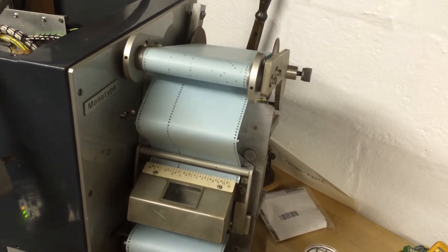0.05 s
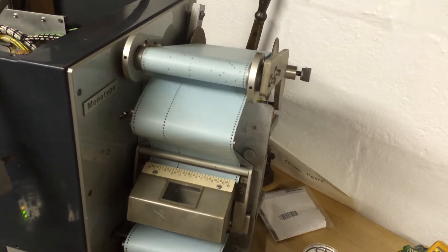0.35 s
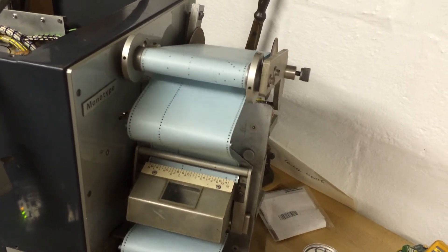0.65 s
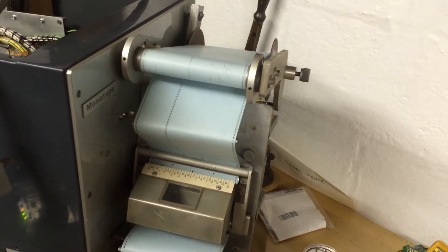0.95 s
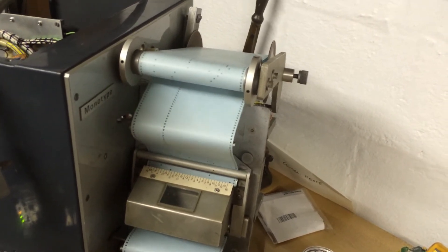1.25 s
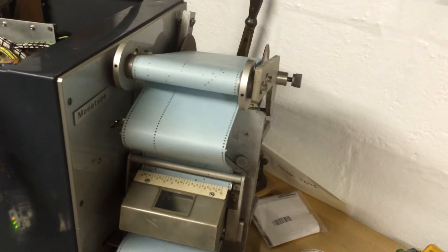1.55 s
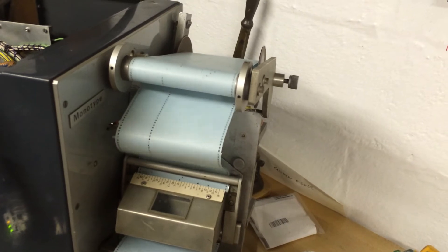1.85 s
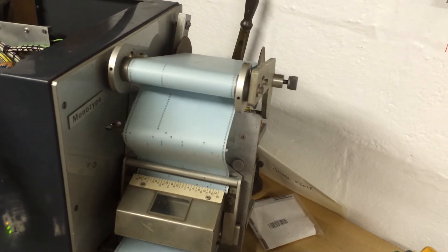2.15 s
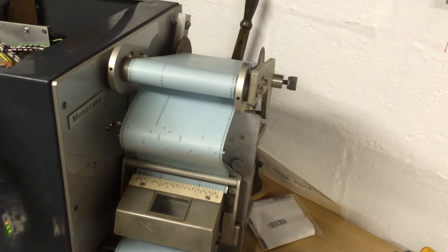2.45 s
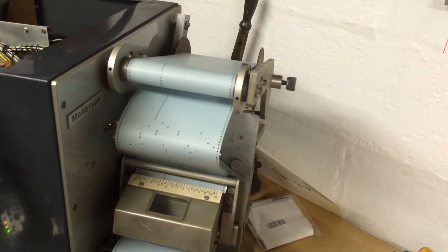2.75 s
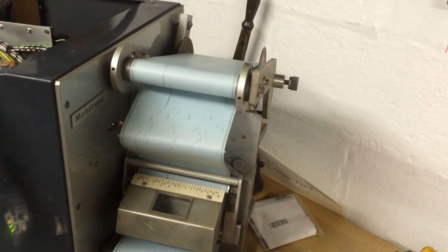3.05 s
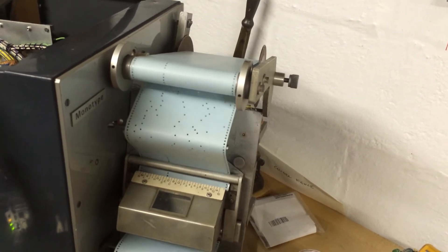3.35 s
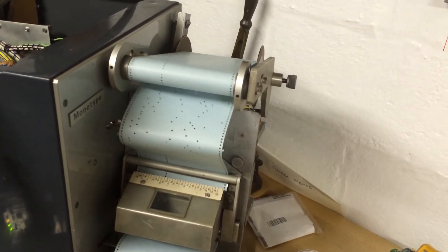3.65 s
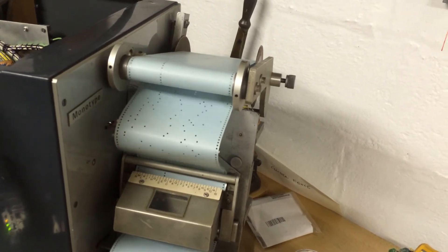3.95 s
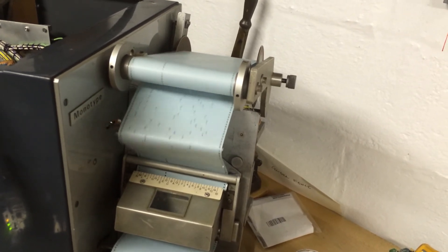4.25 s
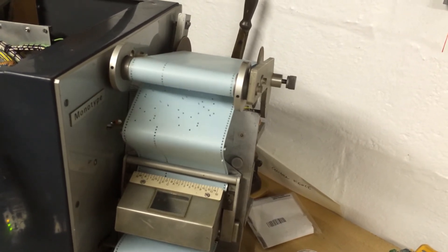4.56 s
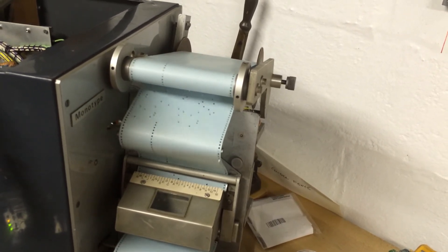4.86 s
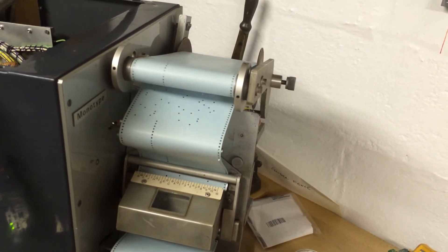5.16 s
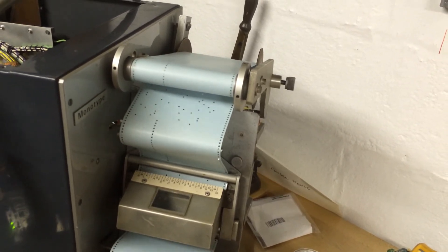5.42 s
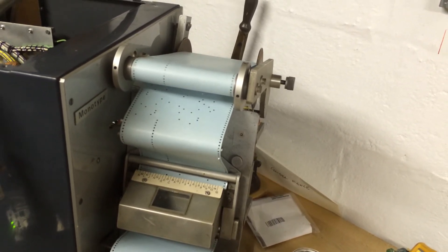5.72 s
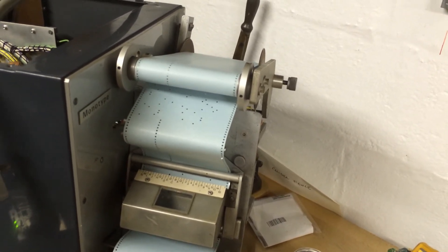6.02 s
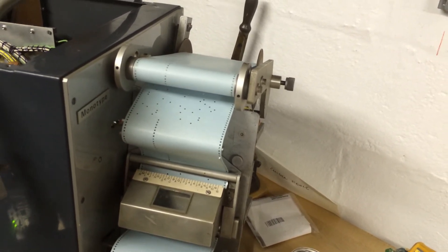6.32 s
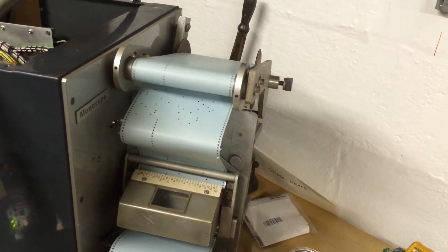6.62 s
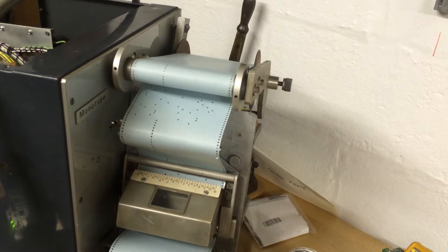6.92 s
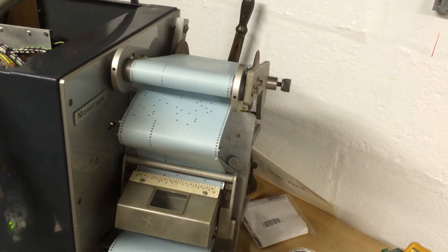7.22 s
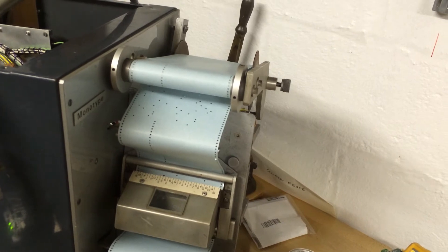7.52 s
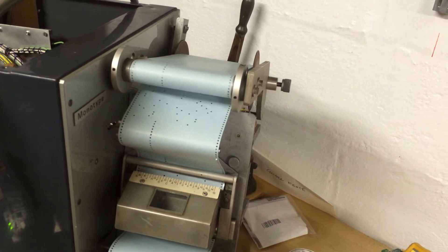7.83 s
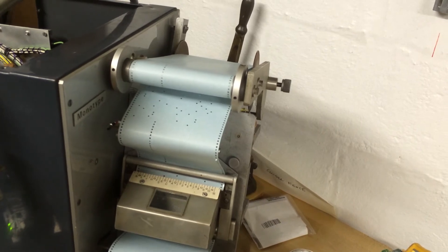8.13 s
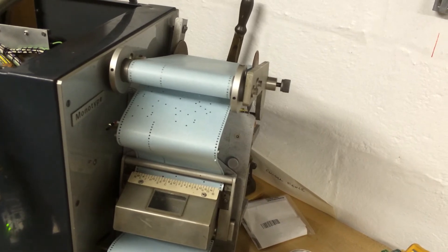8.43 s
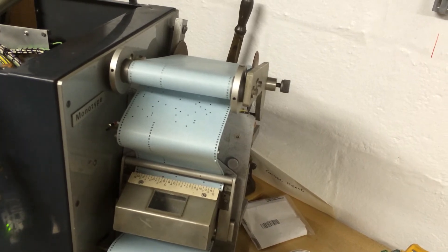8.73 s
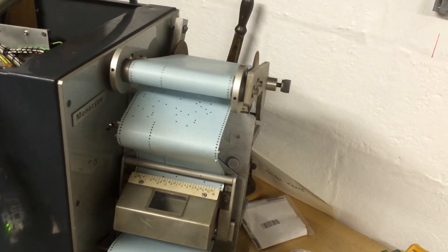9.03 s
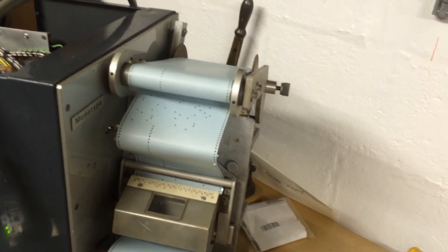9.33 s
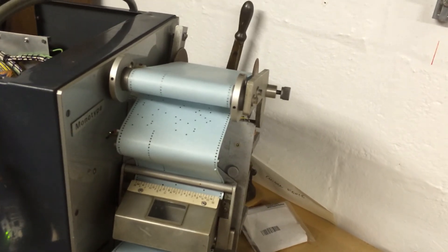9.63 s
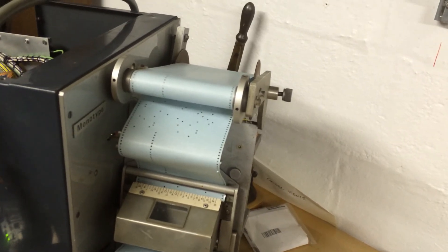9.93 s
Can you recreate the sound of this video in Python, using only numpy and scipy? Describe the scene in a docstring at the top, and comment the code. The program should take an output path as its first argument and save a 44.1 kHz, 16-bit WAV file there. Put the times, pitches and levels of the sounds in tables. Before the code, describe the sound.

A mechanical punch hammers rapidly with ringing steel and air puffs, then stops dead, leaving a fan hum and a small click.

```python
"""On a bench in a small, hard room, an air-driven ribbon punch hammers about 16 times a second.
It punches changing codes, then mostly one code over and over, and stops dead after five seconds.
At each stroke steel parts clash and ring, loose parts rattle, and used air puffs out.
The bare walls echo. A fan hums throughout, and a few small clicks follow the hammering."""
import sys
import numpy as np
from scipy import signal
from scipy.fft import rfft, irfft, next_fast_len
from scipy.io import wavfile

SR = 44100
rng = np.random.default_rng(int(sys.argv[2]) if len(sys.argv) > 2 else 0)


def wav_record(signal):
    """Record a signal, one row per channel, as 16-bit PCM in the file named by sys.argv[1]."""
    frames = np.transpose(np.atleast_2d(signal))
    bounded = np.clip(frames, -1, 1)
    # unit amplitude maps onto the largest positive 16-bit level
    quanta = np.round(bounded * 32767).astype(np.int16)
    wavfile.write(sys.argv[1], SR, quanta)


N = 440118

# the fan's rushing air: pitch_hz, level_db
FAN_RUSH = [(20, -32.5), (40, -16.5), (53, 1), (105, -4.5), (210, 0), (310, -5), (420, -1), (540, -13.5),
            (1150, -10.5), (2200, -15), (2750, -25), (4300, -24), (8000, -36.5), (15000, -43)]
# where the fan's housing rings: pitch_hz, width_hz, level_db
FAN_HOUSING = [(380.6, 32, -68), (784, 25, -65.5), (1000, 110, -56), (1133, 260, -56.5), (1658, 130, -64)]
# motor and blade tones: pitch_hz, level_db
FAN_HUM = [(120, -69), (598, -73), (1012, -62), (1681, -78), (4207, -85)]
# the fan is fainter under the hammering and dips as it ends: time_s, level_db
FAN_LOUDNESS = [(0, -2), (5.05, -3), (5.22, -7), (5.36, 0), (9.98, -1)]
# how long the echo takes to fade by 60 dB: pitch_hz, fade_s
ECHO_FADE = [(150, 0.4), (550, 1.2), (1500, 0.8), (4000, 0.62), (8000, 0.5), (15000, 0.5)]
# the echo's tone: pitch_hz, level_db
ECHO_COLOUR = [(60, -14.5), (300, -13), (550, -4), (800, -9), (1100, -12.5), (1450, -5.5), (1950, -9),
               (3200, -10), (8000, -15), (15000, -18)]
# clicks of the idle machine: start_s, level_db, fade_s, tilt_db_per_octave
IDLE_CLICKS = [(5.277, -69.5, 0.085, -14), (5.297, -66, 0.055, -14), (5.41, -62.5, 0.036, 1),
               (5.457, -68, 0.044, 1), (5.694, -38.5, 0.037, 3), (9.449, -70, 0.089, -2),
               (9.4614, -63, .009, -1), (9.474, -72, .01, -1)]
# the clicks' tone: pitch_hz, level_db
TICK_COLOUR = [(300, -17), (1200, -8), (2000, 5), (2900, -4), (3700, 4.5), (5000, -5.5), (7400, -12),
               (8500, -0.5), (10500, -13), (11800, -1), (13400, -12), (14400, -8)]
# strokes that let out a lot of air: time_s, level_db, times_usual_length
BIG_PUFFS = [(.407, -41.5, 1.06), (.591, -46, 1), (.774, -31, 1.34), (.835, -42.5, 0.97),
             (1.08, -43.5, 0.83), (1.202, -35, 1.8), (1.324, -42.5, 0.58), (1.508, -36.5, 1.2),
             (1.569, -40.5, 1), (1.631, -40.5, 1.2), (1.692, -39.5, 0.9), (2.365, -42, 0.61),
             (3.16, -45, .6), (4.444, -47, .8), (4.995, -38.5, 1.9)]
# the jolted bench's notes: pitch_hz, level_db, fade_s
BENCH_NOTES = [(210, -4, 0.019), (334.5, -2, 0.02), (428.4, 2, .04), (513, -6, 0.02)]
# the rattle's tone: pitch_hz, level_db
LOOSE_COLOUR = [(200, -24.5), (700, -0.5), (1500, 4.5), (2700, 0), (4000, 1), (8000, 0.5), (15000, -10.5)]
# notes of the linkage that punches the repeated code: pitch_hz, level_db, fade_s
LINKAGE_NOTES = [(599.3, -18.5, 0.093), (718, -16, 0.089), (941, -6, 0.054), (1111, 1.5, 0.05),
                 (1494, -2.5, 0.046), (1581, 1.5, 0.047), (1819.7, 1, 0.068), (2313, -16.5, 0.14),
                 (3600, -18, 0.0468), (4104, -5.5, 0.035), (4450, -11, 0.037), (6350, -0.5, 0.031),
                 (7630, -3, 0.033), (8250, -1.5, 0.03), (10400, -4.5, 0.037), (14600, 1.5, .025)]
# the steelwork under that linkage: pitch_hz, level_db
LINKAGE_COLOUR = [(30, -36.5), (130, -18), (300, -17.5), (440, -11), (600, -1.5), (800, -4.5), (1050, 7.5),
                  (1900, 4.5), (2800, -6), (4000, 3.5), (5800, -2), (8400, 5), (10000, -1), (12200, -0.5),
                  (14800, 1.5)]
# notes of the punch bars: pitch_hz, level_db, fade_s
BAR_NOTES = [(585.5, -15.5, 0.0886), (721.4, -17, 0.11), (915, 0.5, 0.072), (1086, -13.5, .07),
             (1295, 3.5, 0.064), (1530, -6, 0.094), (1632, -4, .07), (1817, -3.5, 0.1), (2076, 1, 0.042),
             (3386, 2.5, 0.043), (4470, -4.5, 0.044), (6570, -9.5, .04)]
# the steelwork under the bars: pitch_hz, level_db
BAR_COLOUR = [(30, -31.5), (130, -18), (300, -13), (520, 2.5), (790, -1.5), (1000, 9.5), (1700, 8.5),
              (2700, -1), (3500, 2.5), (5200, 2), (8000, 2.5), (11500, 1.5), (14800, 1.5)]
# when the code keeps changing (otherwise one code repeats): start_s, end_s
CHANGING_CODES = [(.255, 2.515), (4.66, 4.78), (4.965, 5.025)]

# pairs are (repeated code, changing code); a changing code drives more punches, so it hits harder
BAR_SHARE = (.05, .89)  # the punch bars' part in the blow, 0-1
CLASH_DB, BODY_DB = (-18.5, -17.5), (-25.5, -24.5)  # above and below SPLIT_HZ
PUFF_DB, RATTLE_DB = (-64.5, -56.5), (-48.5, -42)
FIRST_STROKE_S, STROKE_PERIOD_S, STROKE_COUNT = .04, .061172, 82
SPLIT_HZ, BLOW_S = 2600, .026
FADE_DB_PER_S = .28  # the body of the blows weakens as the microphone draws back
AGE = np.arange(4096) / SR  # seconds since one short sound began
LEAD = 8192  # spare samples before time zero


def undb(db):
    """Turn decibels into a multiplier."""
    return 10 ** (np.asarray(db) / 20)


def unit(x):
    """Scale a sound to an average power of 1."""
    return x / np.sqrt(np.mean(x ** 2))


def blow_level(x, db):
    """Scale each row so its energy, spread over the length of a blow, has the given level."""
    power = np.sum(x ** 2, -1, keepdims=True) / (BLOW_S * SR)
    return x * undb(db)[..., None] / np.sqrt(power + 1e-18)


def along(points, hz):
    """Read between the rows of a (pitch_hz, value) table, with octaves evenly spaced."""
    pitches, values = np.transpose(points)
    return np.interp(np.log(hz + 1), np.log(pitches), values)


def colour(x, points, size=4096):
    """Shape a sound's tone with a (pitch_hz, level_db) table."""
    hz = np.arange(size // 2 + 1) * SR / size
    cepstrum = irfft(np.log(undb(along(points, hz))))
    cepstrum[1:size // 2] *= 2  # folded so the filter rings only after a sound, never before
    cepstrum[size // 2 + 1:] = 0
    response = irfft(np.exp(rfft(cepstrum)))
    length = next_fast_len(x.shape[-1] + size)
    return irfft(rfft(x, length) * rfft(response, length), length)[..., :x.shape[-1]]


def band(x, hz, kind, order):
    """Keep the lows, the highs or a band between."""
    return signal.sosfilt(signal.butter(order, hz, kind, fs=SR, output="sos"), x)


def fade(age, fade_s):
    """Start at age 0, then die away by 60 dB every fade_s."""
    return (age >= 0) * np.exp(-np.log(1000) * np.maximum(age, 0) / fade_s)


def place(times, sounds):
    """Lay one sound at each time, on a track that starts a little before time zero."""
    out = np.zeros(LEAD + N + sounds.shape[1])
    for time_s, sound in zip(times, sounds):
        start = int(np.clip(LEAD + time_s * SR, 0, LEAD + N))
        out[start:start + len(sound)] += sound
    return out[:LEAD + N]


def ring(notes, count, scatter_db, scatter_turns, detune, build_s):
    """A struck part's notes build up during contact, a little differently at each stroke."""
    out = 0
    for hz, db, fade_s in notes:
        shift, strength, tuning = rng.standard_normal((count, 3)).T[..., None]
        turns = hz * (1 + detune * tuning) * AGE + rng.random() + scatter_turns * shift
        out = out + undb(db + scatter_db * strength) * np.sin(2 * np.pi * turns) * fade(AGE, fade_s)
    build = 1 - np.exp(-(AGE / build_s) ** 2)
    return blow_level(out * build, 0)


def fan(rush_db=-53.5):
    """Air rushes, the housing rings with it, and the motor and blades add faint tones."""
    t = np.arange(N) / SR
    out = undb(rush_db) * unit(colour(rng.standard_normal(N), FAN_RUSH))
    for hz, width, db in FAN_HOUSING:
        housing = band(rng.standard_normal(N), [hz - width / 2, hz + width / 2], "band", order=1)
        out += undb(db) * unit(band(housing, [hz * .84, hz * 1.2], "band", order=2))
    for hz, db in FAN_HUM:
        drift = np.interp(t, np.linspace(0, t[-1], 40), rng.standard_normal(40))
        turns = np.cumsum(hz * (1 + .0015 * drift)) / SR
        out += undb(db) * np.sqrt(2) * np.sin(2 * np.pi * turns)
    return out * undb(np.interp(t, *np.transpose(FAN_LOUDNESS)))


def room(x, bands=14):
    """Near, bare walls give dense echoes; the highs die before the middle pitches."""
    age = np.arange(int(SR * .7)) / SR
    edges = np.geomspace(40, SR / 2, bands + 1)
    hz = np.arange(len(age) // 2 + 1) * SR / len(age)
    noise = np.exp(2j * np.pi * rng.random(len(hz)))
    build = 1 - np.exp(-(age / .0065) ** 2)
    echo = 0
    for low, high in zip(edges[:-1], edges[1:]):
        loudness = unit(build * fade(age, along(ECHO_FADE, np.sqrt(low * high))))
        echo = echo + loudness * irfft(noise * (hz >= low) * (hz < high), len(age))
    return signal.fftconvolve(x, colour(echo, ECHO_COLOUR))[:len(x)]


def clicks():
    """Metal ticks lightly once the machine stands still; the first two are dull, the rest brighter."""
    sounds = []
    for _, db, fade_s, tilt in IDLE_CLICKS:
        contact = (fade(AGE, fade_s) + fade(AGE, .0043)) * rng.standard_normal(len(AGE))
        tone = [(hz, level + tilt * np.log2(hz)) for hz, level in TICK_COLOUR]
        sounds.append(blow_level(colour(contact, tone), db))
    return place(np.array(IDLE_CLICKS)[:, 0], np.array(sounds))


def puff_sizes(times, usual_db):
    """Each stroke's puff has a level and a length: faint, except for the big ones."""
    db, length = usual_db.copy(), np.ones(len(times))
    for time_s, big_db, big_length in BIG_PUFFS:
        stroke = np.argmin(np.abs(times - time_s))
        db[stroke], length[stroke] = big_db, big_length
    return db, length


def puffs(db, length, peak_s=.016, push_s=.00091, suck_s=.0051):
    """Used air escapes: a short push of pressure inside a slower, shallow suction."""
    age = (AGE - peak_s) / length[:, None]
    push = np.exp(-np.abs(age) / push_s) / (2 * push_s)
    suction = np.exp(-(age / suck_s) ** 2) / (np.sqrt(np.pi) * suck_s)
    opening = np.clip(AGE / peak_s, 0, 1)
    return blow_level(push - opening * suction, db)


def bench_knocks(puff_db, below_puff_db=11):
    """The more air a stroke spends, the harder it jolts the bench."""
    knock = ring(BENCH_NOTES, len(puff_db), scatter_db=3.5, scatter_turns=.14, detune=.051, build_s=.002)
    return undb(puff_db - below_puff_db)[:, None] * knock


def rattle_levels(times, usual_db, first_s=.96, period_s=1.12, width_s=.073, surge_db=-30):
    """The loose parts shake up about once a second, then settle; gives each stroke's level in dB."""
    turns = (times - first_s) / period_s
    from_peak_s = (turns - np.round(turns)) * period_s
    surge = undb(surge_db) * np.exp(-.5 * (from_peak_s / width_s) ** 2)
    return 20 * np.log10(np.hypot(undb(usual_db), surge))


def rattle(db, contacts=7):
    """Loose catches and bars scrape and chatter as the mechanism swings back."""
    loudness = 0
    for _ in range(contacts):
        lateness, softness = rng.random((len(db), 2)).T[..., None]
        age = AGE - (.018 + .034 * lateness)
        swell = np.clip(age / .0015, 0, 1)
        loudness = loudness + undb(-11 * softness) * swell * fade(age, .025)
    return blow_level(colour(loudness * rng.standard_normal(loudness.shape), LOOSE_COLOUR), db)


def clash(tone, count, alike, fade_s, seat_s, seat_db, touch_db, grit_db):
    """Steel meets steel: a light touch, the blow with its snap, then the punch settling in its seat."""
    lateness, touch_luck, seat_luck, snap_luck = rng.standard_normal((count, 4)).T[..., None]
    touch = undb(touch_db + 3 * touch_luck) * fade(AGE, .018)
    blow = fade(AGE - .0014, fade_s)
    snap = undb(-5.5 + 4 * snap_luck) * fade(AGE - .0018, .01)
    seat = undb(seat_db + 2.1 * seat_luck) * fade(AGE - (seat_s + .002 * lateness), .047)
    panels = undb(-12.5) * fade(AGE - .003, .075)  # casing and bench ring on
    loudness = np.sqrt(touch ** 2 + blow ** 2 + snap ** 2 + seat ** 2 + panels ** 2)
    # the same parts ring alike at every stroke; chatter at the contacts is new each time
    shape = (count, len(AGE))
    chatter = unit(rng.standard_normal(shape) * undb(grit_db * rng.standard_normal(shape)))
    grain = np.sqrt(alike) * rng.standard_normal(len(AGE)) + np.sqrt(1 - alike) * chatter
    return blow_level(colour(grain * loudness, tone), 0)


def bounce(x, share=.25, lag_s=.0004):
    """Parts bounce and meet again, never quite alike, so each stroke has its own tone."""
    lags = lag_s * np.exp(.5 * rng.standard_normal((len(x), 1)))
    hz = np.arange(len(AGE) + 1) * SR / (2 * len(AGE))
    highs = share * hz / (hz + SPLIT_HZ)  # only the light, bright parts bounce
    second_hit = highs * np.exp(-2j * np.pi * hz * lags)
    return irfft(rfft(x, 2 * len(AGE)) * (1 + second_hit))[:, :len(AGE)]


def punches(clash_db, body_db, bar_share):
    """Each stroke strikes a blend of the repeated code's linkage and a changing choice of bars."""
    count, share = len(bar_share), bar_share[:, None]
    linkage = clash(LINKAGE_COLOUR, count, alike=.24, fade_s=.05,
                    seat_s=.01, seat_db=-10, touch_db=-13.5, grit_db=1.5)
    linkage += undb(-5) * ring(LINKAGE_NOTES, count, scatter_db=1, scatter_turns=.038,
                               detune=.00452, build_s=.005)
    bars = clash(BAR_COLOUR, count, alike=.26, fade_s=.0525,
                 seat_s=.007, seat_db=-7.5, touch_db=-12, grit_db=4)
    bars += undb(-8) * ring(BAR_NOTES, count, scatter_db=5.5, scatter_turns=.27,
                            detune=.014, build_s=.005)
    stroke = bounce(np.sqrt(1 - share) * linkage + np.sqrt(share) * bars)
    body = blow_level(band(stroke, SPLIT_HZ, "low", order=5), body_db)
    return body + blow_level(band(stroke, SPLIT_HZ, "high", order=5), clash_db)


def scene():
    """The machine and its echo, over the fan; the kind of code sets each stroke's strength and tone."""
    times = FIRST_STROKE_S + STROKE_PERIOD_S * np.arange(-2, STROKE_COUNT)  # already running at zero
    changing = sum((times > start) & (times < end) for start, end in CHANGING_CODES)
    # no two strokes are quite alike
    force, bright, breeze, loose = rng.standard_normal((len(times), 4)).T
    body_db = np.take(BODY_DB, changing) + .59 * force - FADE_DB_PER_S * times
    clash_db = np.take(CLASH_DB, changing) + .59 * force + .7 * bright
    puff_db, puff_length = puff_sizes(times, np.take(PUFF_DB, changing) + 4 * breeze)
    rattle_db = rattle_levels(times, np.take(RATTLE_DB, changing) + 3 * loose)
    rattle_db[-1] = -32.5  # the mechanism clatters as it latches after the last stroke
    blows = punches(clash_db, body_db, np.take(BAR_SHARE, changing))
    machine = place(times - .0011, blows + rattle(rattle_db) + bench_knocks(puff_db))
    air = place(times - .012, puffs(puff_db, puff_length))  # the valve opens ahead of the blow
    ticks = clicks()
    echo = room(machine + undb(-12) * air + undb(-4) * ticks)
    return ((machine + air + ticks + echo)[LEAD:] + fan())[None]


def record(dry):
    """The microphone rounds off the biggest peaks; the very highest pitches are cut."""
    top_cut = signal.ellip(10, .2, 70, 15150, fs=SR, output="sos")
    return signal.sosfilt(top_cut, np.tanh(dry))


dry = scene()
out = record(dry)
wav_record(out)
```